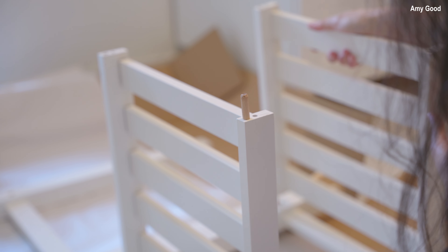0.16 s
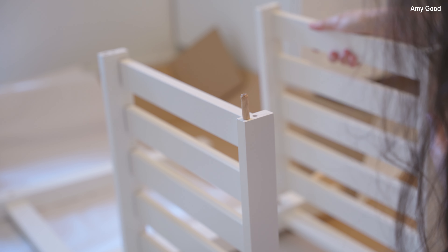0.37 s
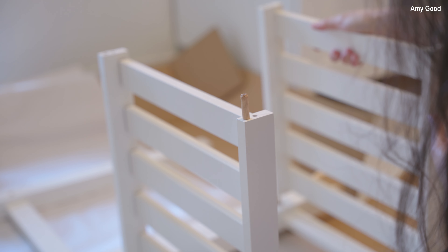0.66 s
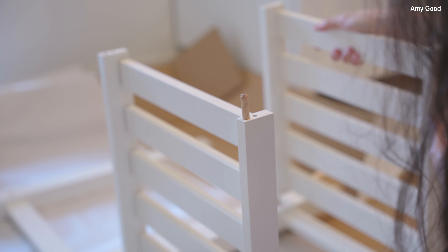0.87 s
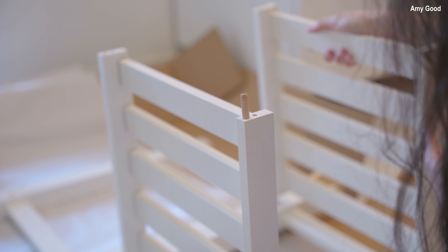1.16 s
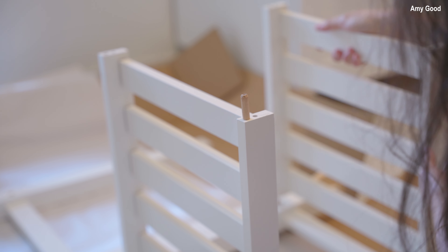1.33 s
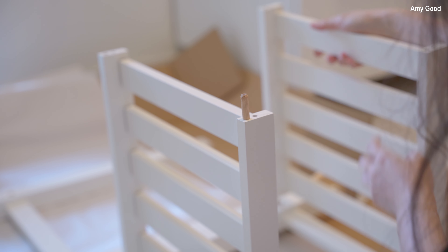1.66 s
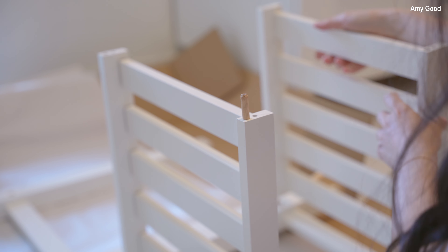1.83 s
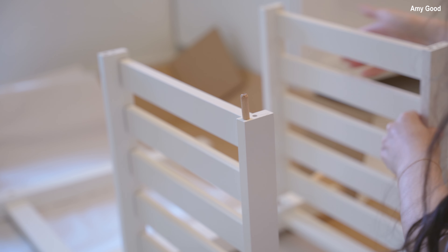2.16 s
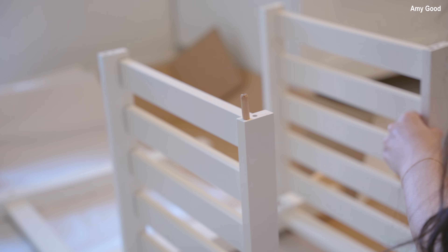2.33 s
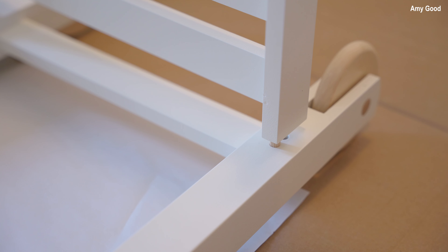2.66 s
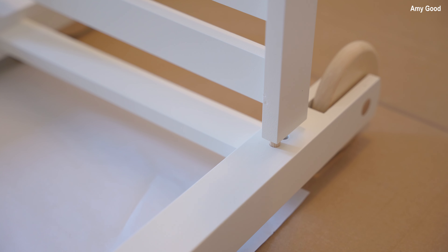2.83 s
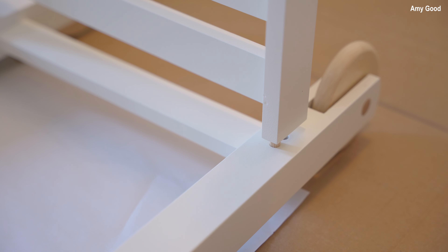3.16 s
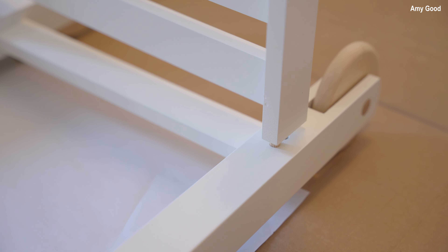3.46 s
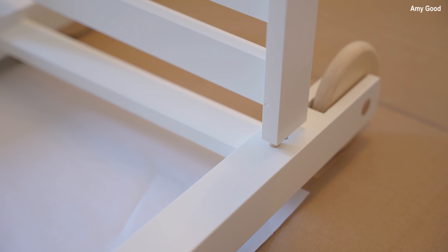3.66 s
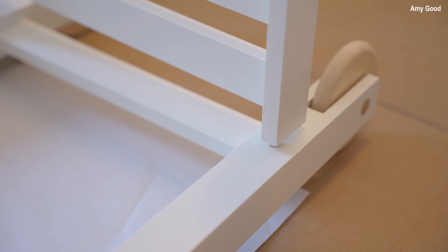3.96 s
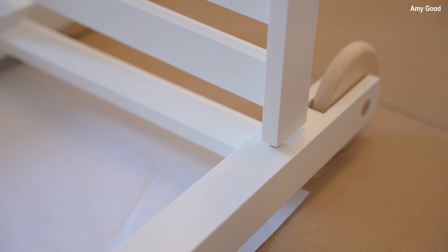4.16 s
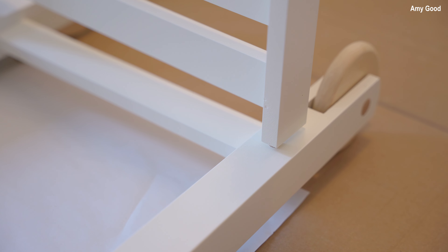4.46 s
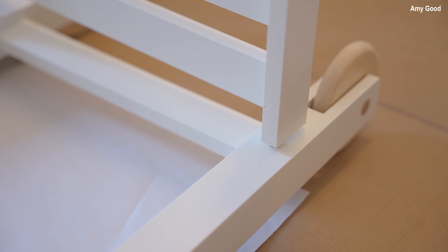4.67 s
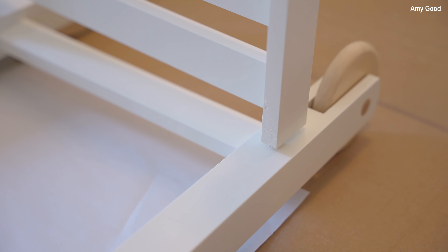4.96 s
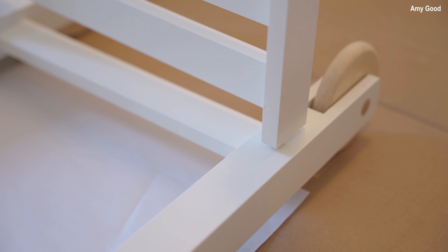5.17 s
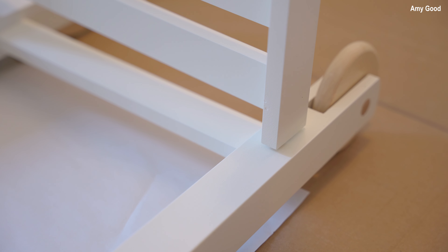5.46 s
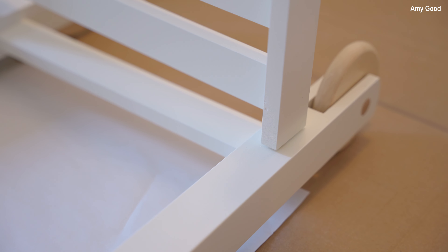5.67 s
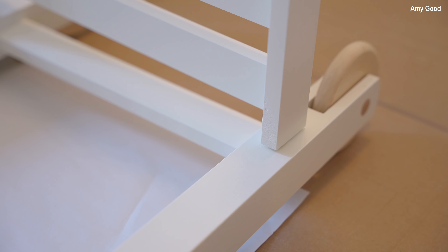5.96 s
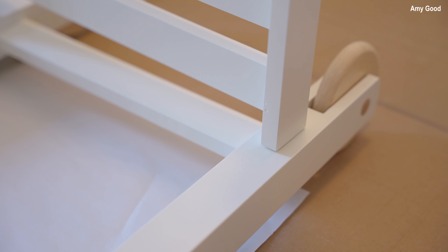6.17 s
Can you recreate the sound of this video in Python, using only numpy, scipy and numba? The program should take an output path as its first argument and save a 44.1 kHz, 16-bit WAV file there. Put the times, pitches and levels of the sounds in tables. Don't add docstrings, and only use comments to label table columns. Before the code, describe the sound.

A faint, wavering low building hum with light hiss lies under everything in a bare, echoing room. From 0.2 to 0.5 s come small, light wooden knocks and a dull settling bump, with a short rub. Around 1.0 s there are more tiny ticks and a low scrape, then two clearer taps at 1.2 s. From 1.3 to 2.1 s soft palm rubbing and faint clicks continue, fading to gentle brushing until about 2.7 s. At 3.0 s a mallet strikes wood, abruptly far louder, somewhat weaker than what follows. Seven more blows land at about 3.45, 3.9, 4.35, 4.8, 5.25, 5.65 and 6.05 s, slightly varied in sharpness. Each is a hard, close crack with a very short woody slat rattle, little bass, mild overload, and a dense half-second room echo that swells back before the next blow; the last is hard and rings off.

```python
import sys
import numpy as np
from scipy import signal
from scipy.fft import rfft, irfft
from scipy.io import wavfile
from scipy.ndimage import uniform_filter1d
from numba import njit

SR = 44100
rng = np.random.default_rng(int(sys.argv[2]) if len(sys.argv) > 2 else 0)


def materialize(psi):
    bounded = np.clip(np.atleast_2d(psi).T, -1, 1)
    quanta = np.round(bounded * 32767).astype(np.int16)
    wavfile.write(sys.argv[1], SR, quanta)


def volts_from_db(level):
    exponent = np.asarray(level, float) / 20
    return 10 ** exponent


N = 277830


def coloured(x, points):
    hz, db = np.transpose(points)
    f = np.arange(len(x) // 2 + 1) * SR / len(x) + 1
    gain_db = np.interp(np.log(f), np.log(hz), db)
    return irfft(rfft(x) * volts_from_db(gain_db), len(x))


def unit(x):
    return x / np.sqrt(np.mean(x ** 2))


def band(x, lo_hz, hi_hz):
    edges_hz = [lo_hz, min(hi_hz, SR / 2.2)]
    return signal.sosfilt(signal.butter(2, edges_hz, "band", fs=SR, output="sos"), x)


def fade(t, t60):
    return np.exp(-np.log(1000) * t / t60)


def ring(t, hz, db, t60):
    modes = fade(t, t60[:, None]) * np.sin(2 * np.pi * hz[:, None] * t)
    return np.sum(volts_from_db(db)[:, None] * modes, axis=0)


def add(out, start_s, sound):
    i = int(start_s * SR)
    out[i:i + len(sound)] += sound[:len(out) - i]


def walk(rate_hz):
    k = int(SR / rate_hz)
    steps = np.repeat(rng.standard_normal(N // k + 1), k)
    smooth = uniform_filter1d(uniform_filter1d(steps, k), k)
    return unit(smooth[:N])


# pitch_hz, density_db
HUM_COLOUR = [(15, -52), (25, -17), (64, -10), (102, -20.5), (157, -5), (293, 1.3), (394, -2.5), (531, -6),
              (754, -8), (840, -12), (1190, -12), (2110, -17.5), (6560, -30.5), (14800, -24.5),
              (16000, -22)]
# pitch_hz, rms_db
MOTOR_LINES = [(120, -74.5), (272, -66.5), (538.3, -70), (635.2, -71), (845.2, -69.5)]
HUM_DB = -63.5


def hum():
    noise = unit(coloured(rng.standard_normal(N), HUM_COLOUR))
    waver = volts_from_db(0.58 * walk(1.6)) - 1
    out = volts_from_db(HUM_DB + 3.0) * (noise + band(noise, 144, 1100) * waver)
    for pitch_hz, rms_db in MOTOR_LINES:
        level = volts_from_db(rms_db - 2.0 + 2.0 * walk(7.3))
        drifting_hz = pitch_hz * (1 + 0.00616 * walk(7.2))
        out += level * np.sin(2 * np.pi * np.cumsum(drifting_hz) / SR)
    return out


# pitch_hz, t60_s
REVERBERATION = [(50, 0.41), (100, 0.46), (200, 0.42), (400, 0.37), (900, 0.59), (2000, .56), (4000, 0.55),
                 (7000, 0.51), (11000, 0.38), (16000, 0.44)]
ECHO_BUILD_S = 0.068


def echo():
    hz, t60 = np.transpose(REVERBERATION)
    f, frames, z = signal.stft(rng.standard_normal(SR * 3 // 4), SR, nperseg=512)
    band_t60 = np.interp(np.log(f + 1), np.log(hz), t60)
    z = z * fade(frames, band_t60[:, None])
    response = signal.istft(z, SR, nperseg=512)[1]
    t = np.arange(len(response)) / SR
    far_walls = np.where(t < .016, .85, 1)
    return response * (1 - fade(t, ECHO_BUILD_S)) * far_walls


# delay_s, level_db
REFLECTIONS = [(.0034, -16), (.0061, -12), (.019, -44), (.023, -29.5), (.034, -25.5)]


def walls(x):
    dull = signal.lfilter(*signal.butter(1, 5000, fs=SR), x)
    return x + sum(volts_from_db(level_db) * np.roll(dull, int(delay_s * SR)) for delay_s, level_db in REFLECTIONS)


# pitch_hz, level_db
ECHO_COLOUR = [(20, -22), (60, -4.5), (150, 1), (400, -0.8), (6000, -0.5), (16000, -13)]


def room(x, wet_db):
    return walls(x) + volts_from_db(wet_db) * signal.fftconvolve(x, coloured(echo(), ECHO_COLOUR))[:N]


# pitch_hz, level_db, t60_s
TOUCHED_MODES = [(1050, -19, 0.065), (1820, -9, 0.022), (2600, -15.5, 0.026), (3610, -14.5, .02),
                 (4220, -16, 0.016), (5900, -26, 0.013), (6940, -22, 0.015)]
OFF_PITCH_DB_PER_OCT2, TOUCH_SCATTER_DB, TOUCH_DETUNE = 5, 2, .022


def touched_slat(t, spot_hz):
    hz, db, t60 = np.transpose(TOUCHED_MODES)
    chance = rng.standard_normal((2, len(hz)))
    off_db = OFF_PITCH_DB_PER_OCT2 * np.log2(hz / spot_hz) ** 2 + TOUCH_SCATTER_DB * chance[0]
    rings = ring(t, hz * (1 + TOUCH_DETUNE * chance[1]), db - off_db, t60)
    rings += ring(t, spot_hz * np.array([.98, 1.025]), np.full(2, -15.5), np.full(2, 0.023))
    rattle = band(rng.standard_normal(len(t)), spot_hz / 2.2, spot_hz * 1.5) * fade(t, 0.08)
    return (rings + volts_from_db(-9) * rattle) * (1 - fade(t, .004))


# start_s, peak_db, spot_hz, tick_db, knock_db
FINGER_KNOCKS = [(0.2326, -36.5, 2900, -11, -10), (0.2608, -30, 3930, -20, 2.5),
                 (0.2767, -31, 3330, -25, -13), (0.39, -35.5, 2600, -33, -21), (0.481, -30, 2600, -33, -30),
                 (0.9812, -30, 4280, -20, -7), (0.9984, -42, 4230, -6, -11), (1.033, -39, 2480, -21, -13),
                 (1.079, -42, 5500, 4, -3), (1.0934, -39, 2390, -6, 1), (1.2054, -22, 2600, -16, -26),
                 (1.2407, -21.5, 2600, -15, -25), (1.584, -47, 4500, -5, 0), (1.627, -44.5, 5900, -10, -1),
                 (1.7908, -38.5, 3100, 0, -17), (1.8222, -37, 4370, -3, -4),
                 (1.8398, -32.5, 2000, -2.5, -8), (2.0648, -39, 2090, -23, -11)]


def knocks():
    out, t = np.zeros(N), np.arange(SR // 8) / SR
    for start_s, peak_db, spot_hz, tick_db, knock_db in FINGER_KNOCKS:
        noise = rng.standard_normal((2, len(t)))
        tick = volts_from_db(tick_db - 1.5) * band(noise[0], 5000, 10400) * fade(t, 0.01)
        knock = volts_from_db(knock_db + 5.5) * band(noise[1], 210, 940) * fade(t, 0.039)
        add(out, start_s, volts_from_db(peak_db) * (touched_slat(t, spot_hz) + tick + knock))
    return out


# start_s, peak_db, pitch_hz
FLOOR_THUDS = [(0.255, -31.5, 503), (.256, -38, 730), (.257, -45, 1040), (.272, -37, 502), (.29, -62, 70),
               (.48, -66, 65), (1.051, -53, 76), (1.056, -55, 170), (1.058, -50, 386), (.982, -51, 784),
               (1.84, -45.5, 830), (1.841, -51, 1300), (1.629, -50, 700)]
THUD_T60_S, THUD_SLOPE = .14, 0.58


def thuds():
    out, t = np.zeros(N), np.arange(SR // 8) / SR
    for start_s, peak_db, pitch_hz in FLOOR_THUDS:
        t60_s = THUD_T60_S * (100 / pitch_hz) ** THUD_SLOPE
        envelope = fade(t, t60_s) * (1 - fade(t, t60_s / 25))
        add(out, start_s, volts_from_db(peak_db) * np.sin(2 * np.pi * pitch_hz * t) * envelope)
    return out


# middle_s, half_length_s, rub_db, scrape_db
PALM_STROKES = [(.1, 0.11, -92, -87), (0.327, 0.037, -69, -68), (0.45, 0.038, -60.5, -62.5),
                (0.544, 0.049, -81, -72), (.9, 0.035, -83, -69), (1.05, 0.056, -62, -54),
                (1.326, 0.16, -64.5, -77), (1.65, 0.011, -64, -67), (1.737, 0.055, -69, -77),
                (1.86, 0.072, -64, -65), (2.053, 0.081, -68, -76), (2.28, 0.13, -68, -78),
                (2.586, 0.13, -65.5, -72)]
# pitch_hz, level_db
PALM_COLOUR = [(900, -10), (1800, -3), (2600, -3.5), (4500, -7), (7000, -10), (11000, -19), (15000, -27)]


def rubbing():
    out, t = np.zeros(N), np.arange(N) / SR
    rub = unit(coloured(rng.standard_normal(N), PALM_COLOUR)) * volts_from_db(1.8 * walk(59.1))
    scrape = unit(band(rng.standard_normal(N), 150, 1200)) * volts_from_db(2.5 * walk(30))
    for middle_s, half_length_s, rub_db, scrape_db in PALM_STROKES:
        stroke = np.exp(-((t - middle_s) / half_length_s) ** 2)
        out += stroke * (volts_from_db(rub_db) * rub + volts_from_db(scrape_db) * scrape)
    return out


def head_contact(t):
    push = np.exp(-((t - .00014) / .00007) ** 2)
    suction = np.exp(-((t - .00031) / .00009) ** 2)
    return push - .8 * suction


def joint_crack(t):
    burst = band(rng.standard_normal(len(t)), 4500, 7530)
    return burst * fade(t, 0.0054) * (1 - fade(t, 0.0006))


# pitch_hz, level_db, t60_s
RAIL_MODES = [(65, -56, 0.14), (99, -37, 0.075), (188, -23, 0.034), (260, -18.5, 0.026), (560, -16, 0.026),
              (663, 5.5, 0.013), (771, -19.5, 0.12), (1300, -6.5, 0.045), (1581, -1, 0.03),
              (1740, -4, 0.02), (1940, -27, 0.027), (2278, 4, 0.016), (2786, -17, 0.026),
              (3100, -14.5, 0.03), (4050, -4, 0.0043), (3960, -6, 0.0028), (4670, -11.5, 0.0048),
              (6500, -35, .005), (7080, -17, 0.0026)]


def struck_rails(t, crack_db, bass_db, slat_db, tuning):
    hz, db, t60 = np.transpose(RAIL_MODES)
    chance = rng.standard_normal((2, len(hz)))
    tilt_db = bass_db * (hz < 900) + crack_db * (hz > 3500) + slat_db * (np.abs(hz - 2800) < 500)
    rails = ring(t, hz * tuning * (1 + .015 * chance[0]), db + tilt_db + 1.5 * chance[1], t60)
    rails += volts_from_db(10.0) * band(rng.standard_normal(len(t)), 846, 3080) * fade(t, 0.021)
    return rails * (1 - fade(t, 0.011))


# pitch_hz, half_width_hz, level_db
SLAT_MODES = [(540, 35, 3), (635, 35, 3), (785, 40, 2.5), (1450, 120, 1), (1750, 120, 1.5), (2570, 100, 4),
              (3050, 110, 3), (3450, 130, 2.5), (4000, 100, 1.5), (4550, 90, 3), (5500, 150, 3.5),
              (6900, 200, 2)]


def slat_rings(x, slat_db, tuning):
    hz, width, db = np.transpose(SLAT_MODES)
    lift_db = db + slat_db * (np.abs(hz - 3100) < 700) + 1.5 * rng.standard_normal(len(hz))
    f = np.arange(len(x) // 2 + 1) * SR / len(x)
    bumps = lift_db[:, None] * np.exp(-((f - hz[:, None] * tuning) / width[:, None]) ** 2)
    return irfft(rfft(x) * volts_from_db(bumps.sum(axis=0)), len(x))


# pitch_hz, level_db
FRAME_SPREAD = [(24, -64), (40, -34), (69, -17), (194, -21), (320, -10), (392, -10.5), (529, -6), (942, -8),
                (2050, -1.5), (2320, -6.5), (2570, -6), (3220, -12), (5440, -21.5), (12800, -43),
                (16000, -52.5)]
LATE_SWELL_S, LATE_SWELL_SPREAD_S, LATE_SWELL_DB = 0.062, 0.015, 1.5


def blow_echo(shared, blow_db, crack_db, bass_db, slat_db, tuning):
    tail = unit(coloured(.75 * shared + .65 * echo(), FRAME_SPREAD))
    tail = coloured(tail, [(300, bass_db), (1200, 0), (2500, 0), (6000, crack_db / 2)])
    tail = slat_rings(tail, slat_db, tuning)
    t = np.arange(len(tail)) / SR
    swell_db = LATE_SWELL_DB * volts_from_db(blow_db) * np.exp(-((t - LATE_SWELL_S) / LATE_SWELL_SPREAD_S) ** 2)
    return volts_from_db(blow_db - 25 + swell_db) * tail * (1 - fade(t, .004))


# start_s, strength_db, contact_db, hardness_db
MALLET_BLOWS = [
    (3.0202, -3.5, -1, -1),
    (3.4506, 1, 8.5, 1),
    (3.9102, 2, -2, 5),
    (4.352, 1.5, 0.5, -1),
    (4.8265, .5, 10.5, 0.5),
    (5.2403, 2, -1, 2.5),
    (5.64927, 1, 11, 1),
    (6.05956, 1.5, 6, 5),
]
BASS_DB, SLAT_PER_HARDNESS = 0.5, 0.58
RING_PER_HARDNESS = 0.13
DETUNE = .01


def mallet():
    near, far, t = np.zeros(N), np.zeros(N), np.arange(SR // 8) / SR
    shared = echo()
    for start_s, blow_db, contact_db, crack_db in MALLET_BLOWS:
        slat_db = SLAT_PER_HARDNESS * crack_db
        tuning = 1 + DETUNE * rng.standard_normal()
        rails = struck_rails(t, crack_db, BASS_DB, slat_db, tuning)
        rails_db = blow_db - 0.8 + RING_PER_HARDNESS * crack_db
        add(near, start_s, volts_from_db(blow_db + contact_db - 3.0) * head_contact(t))
        add(near, start_s + .0003, volts_from_db(rails_db) * rails)
        add(near, start_s + .0008, volts_from_db(blow_db + crack_db + 3) * joint_crack(t))
        add(far, start_s + 0.000923, blow_echo(shared, blow_db, crack_db, BASS_DB, slat_db, tuning))
    return walls(band(near, 280, 18000)) + far


def scene():
    handling = knocks() + thuds() + rubbing()
    return (hum() + room(handling, wet_db=-37.0) + mallet())[None]


@njit
def follow(x, attack, release):
    out, e = np.empty(len(x)), 0.
    for i in range(len(x)):
        e += (abs(x[i]) - e) * (attack if abs(x[i]) > e else release)
        out[i] = e
    return out


def low_pass(x):
    return signal.sosfilt(signal.butter(12, 17090, fs=SR, output="sos"), x)


LIMIT_DB, LIMIT_ATTACK_S, LIMIT_RELEASE_S = -11, 0.0029, 0.022


def record(dry):
    peak = follow(dry[0], 1 / (LIMIT_ATTACK_S * SR), 1 / (LIMIT_RELEASE_S * SR))
    held = dry * np.minimum(1, volts_from_db(LIMIT_DB) / (peak + 1e-9))
    held = signal.sosfilt(signal.ellip(8, .2, 70, 15850, fs=SR, output="sos"), held)
    clipped = held / (1 + np.abs(held / .8) ** 6) ** (1 / 6)
    passed = signal.sosfilt(signal.butter(2, 50, "high", fs=SR, output="sos"), clipped)
    passed = signal.sosfilt(signal.ellip(8, .2, 70, 16650, fs=SR, output="sos"), passed)
    return low_pass(passed)


dry = scene()
out = record(dry)
materialize(out)
```